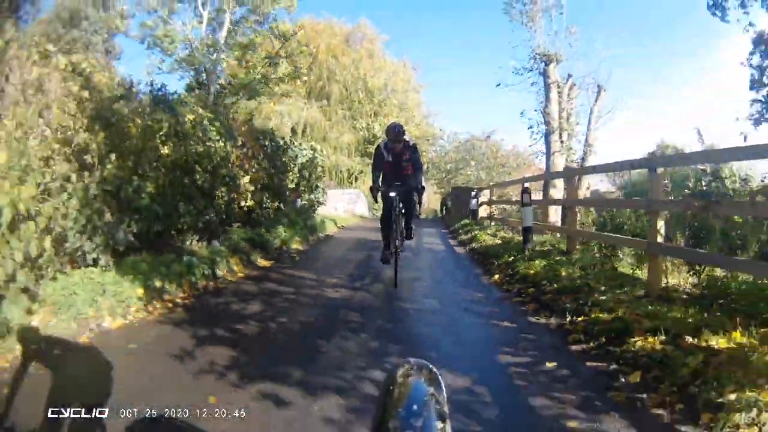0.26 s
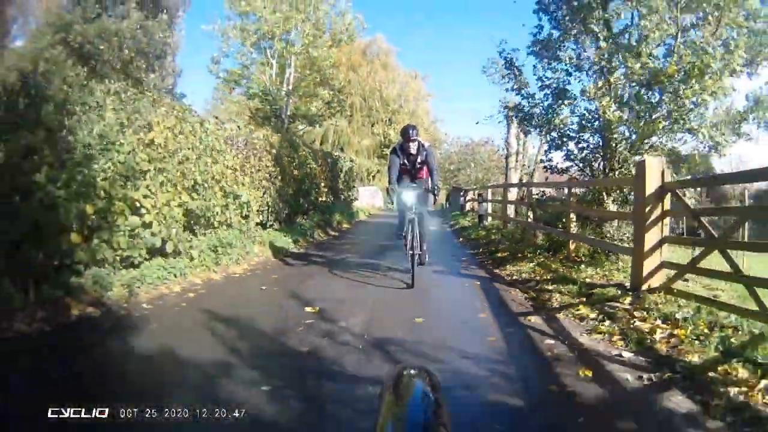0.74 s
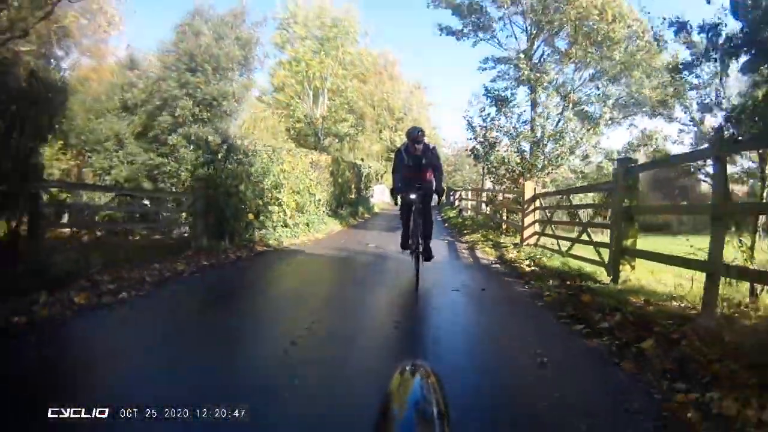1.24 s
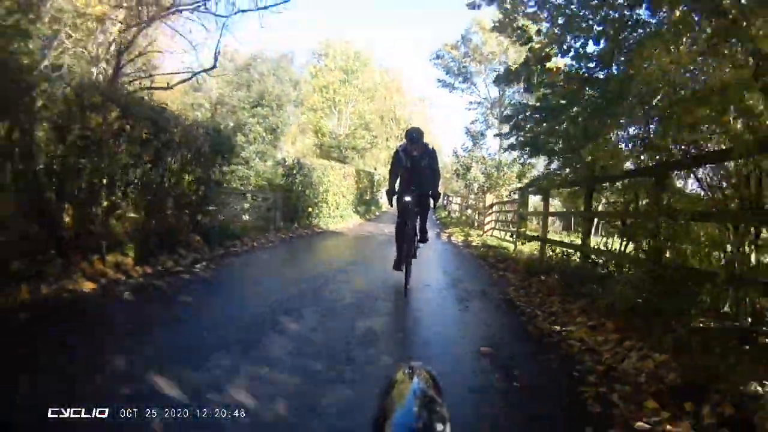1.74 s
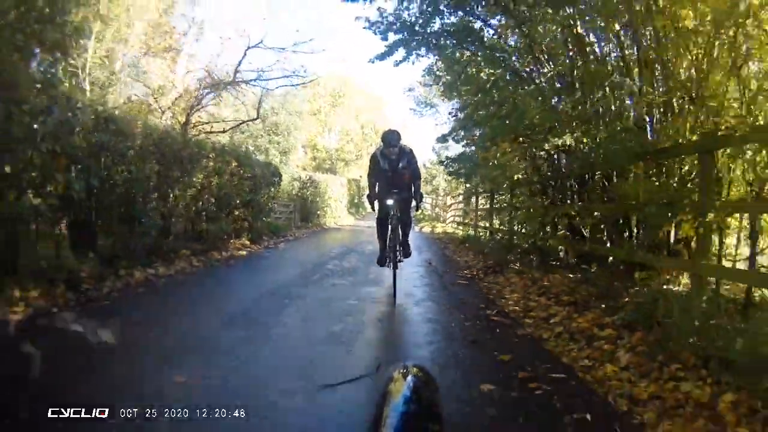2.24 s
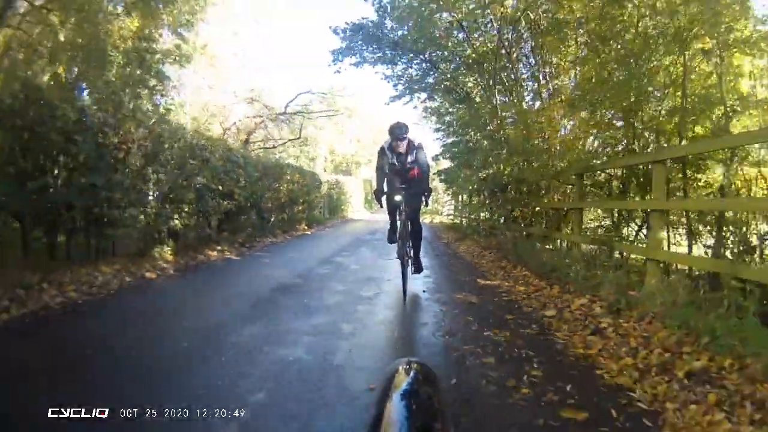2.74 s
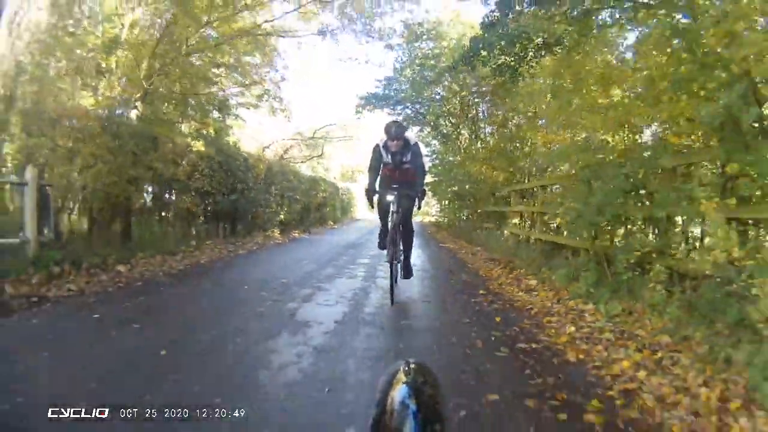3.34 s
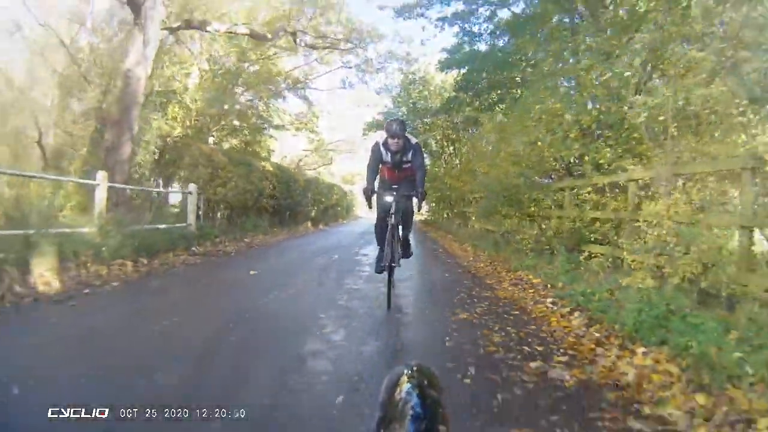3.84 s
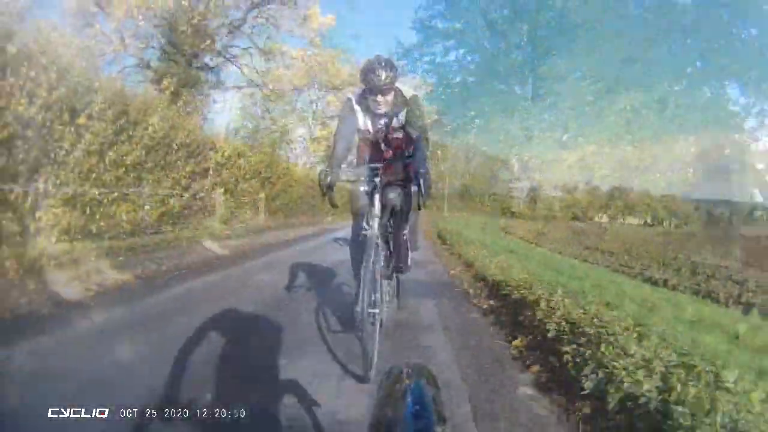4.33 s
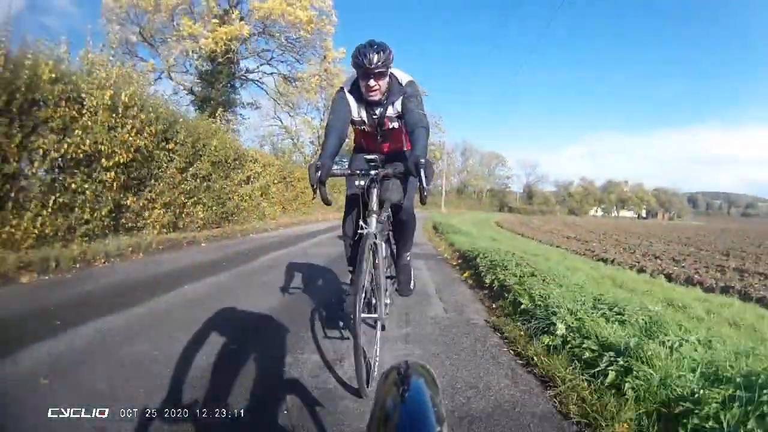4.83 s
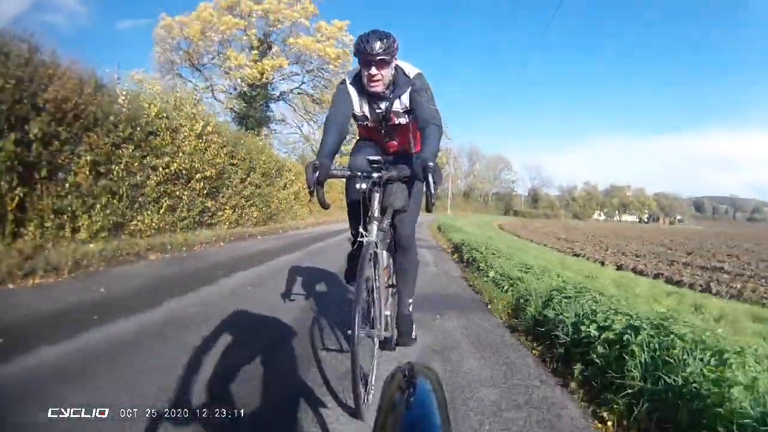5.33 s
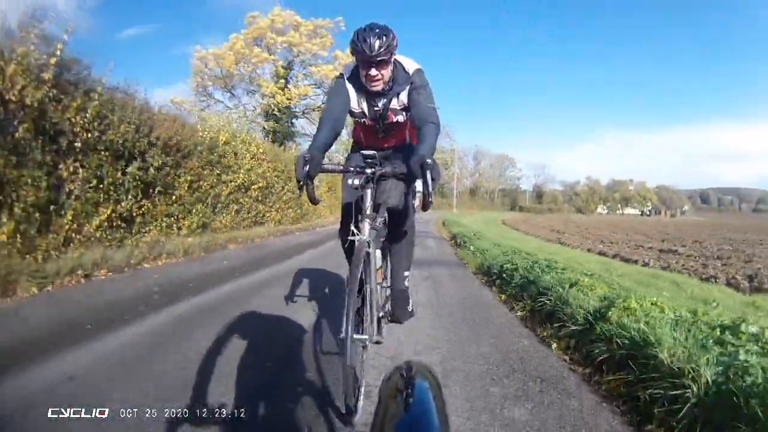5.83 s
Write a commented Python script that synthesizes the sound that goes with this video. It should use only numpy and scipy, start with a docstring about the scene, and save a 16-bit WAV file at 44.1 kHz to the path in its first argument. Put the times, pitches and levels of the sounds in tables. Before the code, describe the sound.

Very close stereo sound from inside a hard plastic housing on a rolling bike. Continuous rough, hollow rushing flutters quickly with the surface. Irregular bursts of tiny hard ticks and sharper snaps jump between the sides, favouring the right, busiest in the first second and a half with some dull bumps. Past four seconds the rush is softer, the clicks thinner, and the last half second nearly free of sharp snaps.

```python
"""On a lane, a camera clamped to a bicycle rolls along, first over rough wet ground, then smoother.
The road shakes the housing: filtered noise whose modes reach two microphones in or out of phase.
Loose parts tick against the case in bursts, some at the left microphone, most at the right:
short noise contacts ring its modes. Dull knocks come through the clamp, and loud peaks overload softly."""
import sys
import numpy as np
from scipy import signal
from scipy.fft import rfft, irfft
from scipy.io import wavfile

SR = 44100
rng = np.random.default_rng(int(sys.argv[2]) if len(sys.argv) > 2 else 0)


def invert_db(level):
    """Linear amplitude ratio for a level in decibels (20 dB per decade), elementwise."""
    return 10 ** (np.asarray(level, dtype=float) / 20)


def wav_out(sig):
    """Save sig, one row per channel (or a flat mono array), as 16-bit PCM at SR to the path in sys.argv[1]."""
    wavfile.write(sys.argv[1], SR, np.round(np.clip(np.atleast_2d(sig).T, -1, 1) * 32767).astype(np.int16))


N = 268128


def drift(corner_hz):
    """Slow random wandering of spread 1: noise smoothed by two equal one-pole low-passes."""
    stride, run_in = 40, 2000      # samples per slow step, slow steps thrown away
    pole = np.exp(-2 * np.pi * corner_hz * stride / SR)
    noise = rng.standard_normal(N // stride + run_in + 2)
    slow = signal.lfilter([1], [1, -2 * pole, pole * pole], noise)[run_in:]
    return np.interp(np.arange(N) / stride, np.arange(len(slow)), slow / slow.std())


def shaken(modes, hz, lumps_db):
    """Noise of its own shakes each mode, which reaches the two microphones with its own phase."""
    out = 0
    for mode_hz, width_hz, left_db, right_db, left_lead in modes:
        resonance = 1 / (1 + 1j * (hz - mode_hz ** 2 / hz) / width_hz) ** 2     # squared: steep skirts
        microphones = np.array([[invert_db(left_db) * np.exp(1j * left_lead)], [invert_db(right_db)]])
        # low modes swell less than high ones
        swell = invert_db(min(mode_hz / 2500, 1) * (lumps_db + 3.35 * drift(corner_hz=64)))
        noise = rng.standard_normal(N) * swell
        out = out + irfft(rfft(noise) * resonance * microphones, N)
    return out


def road(shake_db, rumble_db):
    """Housing modes and a smoother rush swell with the lumps of the surface; the frame rumbles below."""
    # frame modes, nearly in phase on both sides:
    # (frequency [Hz], width [Hz], left level [dB], right level [dB], left lead [rad])
    frame_modes = [(46, 210, -15, -20.5, -0.12), (86.7, 15.6, -5.5, -3, -0.18),
                   (127, 123, -14.5, -9, -0.086), (243, 87, -5.5, -2.5, -0.022),
                   (358.3, 85, -1, -0.5, 0.019)]
    # housing modes, the same columns:
    # (frequency [Hz], width [Hz], left level [dB], right level [dB], left lead [rad])
    housing_modes = [(566, 145, -11, -2, 4), (742.6, 147, -1.5, -3, 2), (950, 220, 2, 4, 3),
                     (1268, 138, -5.5, -7, 0.12), (1970, 480, -24, -16, 1.3), (2559, 350, -0.5, 0, -1.76),
                     (3070, 220, -1.5, 0, -3)]
    # rush that each microphone picks up alone: (frequency [Hz], relative level [dB])
    rush_curve = [(25, -38), (150, -37), (450, -18), (750, -10.5), (1100, -11), (1600, -15.5),
                  (3400, -14.5), (4500, -22), (6000, -30), (9000, -34.5), (12000, -34), (16000, -41.5)]
    right_rush_db = 3

    hz = np.fft.rfftfreq(N, 1 / SR) + 1e-3      # just above zero, for the logarithm
    lumps_db = 1.81 * drift(corner_hz=50)
    curve_hz, curve_db = np.transpose(rush_curve)
    rush_db = np.interp(np.log(hz), np.log(curve_hz), curve_db)
    rush_spectrum = rfft(rng.standard_normal((2, N))) * invert_db(rush_db + [[0], [right_rush_db]])
    rush = irfft(rush_spectrum, N) * invert_db(1.32 * lumps_db)
    housing = rush + shaken(housing_modes, hz, lumps_db)
    rumble = shaken(frame_modes, hz, lumps_db)
    return invert_db(shake_db + 22) * housing + invert_db(rumble_db + 23) * rumble


def contacts(count, contact_s, size):
    """Rough contacts: noise that swells and fades within milliseconds, different at each microphone."""
    duration_s = contact_s * invert_db(3.5 * rng.standard_normal((count, 1, 1)))
    t = (np.arange(size) / SR - 0.003) / duration_s      # strongest 3 ms after the start
    return np.exp(-t ** 2) * rng.standard_normal((count, 2, size))


def rung(touch, modes, band_hz, strength_db=None):
    """Every contact rings decaying modes with strengths of its own; each result has peak 1."""
    out = 0
    for hz, level_db, t60 in modes:
        decay = invert_db(-60 / (t60 * SR))      # gain per sample: 60 dB down after t60
        turn = 2 * np.pi * hz / SR
        mode_db = level_db + 4 * rng.standard_normal(touch.shape[:2] + (1,))
        if strength_db is not None:
            mode_db = mode_db + strength_db(hz)
        resonator = [1, -2 * decay * np.cos(turn), decay * decay]
        out = out + invert_db(mode_db) * signal.lfilter([0, np.sin(turn)], resonator, touch + 1e-18)
    out = signal.sosfilt(signal.butter(2, band_hz, "band", fs=SR, output="sos"), out)
    return out / np.abs(out).max(axis=-1, keepdims=True)


def laid_out(hits, s):
    """Adds up hits on the timeline, each starting 3.5 ms before its time and faded at its end."""
    size = hits.shape[-1]
    out = np.zeros((2, N + size))
    start = np.clip(np.round((s - 0.0035) * SR).astype(int), 0, N)
    fade = np.minimum(1, np.linspace(4, 0, size))      # over the last quarter
    for side in range(2):
        np.add.at(out[side], start + np.arange(size), hits[:, side] * fade)
    return out[:, :N]


def knocks():
    """Bumps pass through the clamp as short dull knocks; modes near the knock's pitch ring most."""
    # knocks heard on both sides: (time [s], relative level [dB], pitch [Hz])
    knock_rows = [(0.215, -15, 1520), (.260, -14, 1900), (.355, -10.5, 950), (0.372, -21, 1320),
                  (.639, -17.5, 1030), (.851, -25, 1310), (0.878, -18, 1390), (.905, -19.5, 800),
                  (6.002, -20, 2000)]
    # modes of the clamp: (frequency [Hz], relative level [dB], time to fall 60 dB [s])
    clamp_modes = [(800, -15, 0.013), (1050, -7.5, 0.015), (1460, 1, 0.0087), (1580, -10, 0.0099),
                   (2000, 0, 0.015)]

    s, peak_db, pitch_hz = np.transpose(knock_rows)[:, :, None, None]
    touch = contacts(len(knock_rows), contact_s=0.0013, size=1024)[:, :1]      # one path for both sides

    def near_pitch_db(hz):
        return -12 * np.abs(np.log2(hz / pitch_hz))      # 12 dB weaker per octave away

    knock = rung(touch, clamp_modes, band_hz=[600, 3000], strength_db=near_pitch_db)
    sides_db = [[-2.5], [1.5]]      # left, right
    return laid_out(knock * invert_db(peak_db + sides_db), s[:, 0] + 0.00304)


def agitation(chatter_db, part):
    """Level of a part's chatter: it follows the ride, and each jolt lifts it, holds it and lets it sink."""
    # jolts that set a loose part chattering, by the microphone it is near, "L" or "R":
    # (middle [s], level [dB], length [s], part)
    jolts = [(0.161, -21, .1, "R"), (.34, -25, .1, "L"), (0.392, -22, .12, "R"), (0.461, -26.5, .25, "L"),
             (0.558, -25, .1, "R"), (0.679, -22.5, .13, "L"), (.85, -26, .22, "R"), (0.884, -28, .15, "L"),
             (1.0, -21, .1, "R"), (1.298, -24, .2, "L"), (1.584, -26, .2, "R"), (1.598, -28, .2, "L"),
             (1.853, -23, .12, "R"), (2.471, -20, .11, "R"), (2.702, -28, .2, "R"), (3.11, -24, .05, "R"),
             (3.162, -25, .09, "L"), (3.475, -26, .07, "R"), (3.5, -29, .25, "L"), (3.587, -25, .06, "R"),
             (3.721, -26, .22, "R"), (4.051, -31, .15, "L"), (4.138, -20, .15, "R"), (4.141, -29, .15, "L"),
             (4.347, -22, .18, "R"), (4.55, -26, .13, "R"), (4.575, -31, .12, "L"), (4.669, -25, .08, "R"),
             (4.934, -28, .09, "R"), (5.154, -33, .27, "R"), (5.2, -34, .4, "L"), (5.349, -26, .14, "R")]
    # chatter between jolts, against the ride's chatter: part "L" or "R" -> (level [dB])
    calm_offset_db = {"L": -0.55, "R": 0.48}
    rise, hold = 0.3, 0.35      # shares of a jolt's length; it sinks in the rest

    t = np.arange(N) / SR
    calm_db = chatter_db + calm_offset_db[part]
    corners = np.cumsum([-0.5, rise, hold, 1 - rise - hold])
    level_db = calm_db
    for s, top_db, length_s, struck in jolts:
        if struck == part:
            lift = np.interp(t, s + length_s * corners, [0, 1, 1, 0])
            level_db = np.maximum(level_db, calm_db + lift * (top_db - calm_db))
    return level_db


def chatter(level_db, pan_db, count=1250):
    """Draws small ticks of one part: harder shaking makes them denser, stronger and brighter."""
    density = np.cumsum(invert_db(1.3 * level_db))
    at = np.interp(rng.random(count), density / density[-1], np.arange(N)).astype(int)
    size_db = 1.78 * np.minimum(rng.exponential(1, count), 3) + 3.1 * drift(corner_hz=42)[at]
    peak_db = 0.66 * (level_db[at] + 20.5) + size_db - 21
    treble_db = -16.5 + 1.32 * (level_db[at] + 18) + size_db + 4 * rng.standard_normal(count)
    return np.transpose([at / SR, peak_db, np.full(count, pan_db), treble_db])


def rattle(rows, contact_s, level_db):
    """Each tick rings the case; hard ones favour its upper modes and ring its treble more."""
    # lower modes of the case: (frequency [Hz], relative level [dB], time to fall 60 dB [s])
    case_modes = [(2040, -21, 0.0097), (2560, 7, 0.0012), (3060, 12.5, 0.0053), (3418, 6, 0.011),
                  (3733, -7, 0.014), (4190, -28.5, 0.011)]
    # treble modes of the case: (frequency [Hz], relative level [dB], time to fall 60 dB [s])
    treble_modes = [(4900, -21, 0.00027), (6900, -12, 0.0016), (7780, 11, 0.00093), (9480, 16.5, 0.00097),
                    (10800, -12, 0.00052), (13700, -2, 0.0017)]
    smooth_road_s = 4.05

    s, peak_db, pan_db, treble_db = np.transpose(rows)[:, :, None, None]
    touch = contacts(len(rows), contact_s, size=512)
    # dB per octave; ticks are thinner on the smooth road
    tilt_db = 2.3 * (treble_db + 21.5) + 36 * (s > smooth_road_s)

    def upper_modes_db(hz):
        return tilt_db * np.log2(hz / 3000)

    tick = rung(touch, case_modes, band_hz=[1500, 5000], strength_db=upper_modes_db)
    tick += invert_db(treble_db - 1) * rung(touch, treble_modes, band_hz=[4500, 14000])
    sides = invert_db(pan_db * [[0.5], [-0.5]])
    sides /= np.sqrt((sides ** 2).sum(axis=1, keepdims=True))      # same power at any pan
    return laid_out(tick * sides * invert_db(peak_db + level_db), s[:, 0])


def scene():
    """Road shaking and knocks, with chatter and clear ticks of the loose parts over them."""
    # the ride, levels relative:
    # (time [s], road shaking [dB], frame rumble [dB], chatter between jolts [dB])
    ride = [(0, -40, -53.5, -32), (1.2, -40, -53.5, -31.5), (2.2, -40, -53, -33), (3.0, -40, -52, -34.5),
            (3.9, -39.5, -51.5, -34), (4.3, -43.5, -55, -33), (4.8, -44.5, -54.5, -38.5),
            (6.08, -45.5, -53.5, -38)]
    # clear ticks of a left, centre or right part, "L", "C" or "R":
    # (time [s], relative level [dB], relative treble [dB], part)
    clear_ticks = [(0.084, -9, -9, "R"), (0.1048, -9, -23, "C"), (0.1477, -9.5, -14, "R"),
                   (0.1546, -10, -4, "R"), (0.1612, -7.5, -8.5, "R"), (0.169, -7, -11, "R"),
                   (0.2176, -10.5, -9.5, "C"), (.2343, -12, -34, "C"), (0.2614, -7, -15, "C"),
                   (0.3595, -7, -16, "C"), (.3848, -4, -9, "R"), (.4, -12, -5, "R"), (.405, -12, -6, "R"),
                   (0.413, -6, -12, "R"), (0.4374, -9, -10.5, "L"), (.4528, -13, -28, "L"),
                   (0.4933, -24, -29, "C"), (.5236, -10.5, -16, "L"), (0.5665, -8, -15, "C"),
                   (0.5965, -6, -12.5, "L"), (0.643, -17, -17, "C"), (0.6675, -15, -26, "L"),
                   (0.6875, -8.5, -7.5, "L"), (0.7913, -2.5, -11, "R"), (0.906, -7, -14, "C"),
                   (.9746, -4.5, -8.5, "L"), (.9815, -12.5, -10, "R"), (.992, -22, 2, "R"),
                   (1.014, -4, -13, "R"), (1.041, -6.5, -11, "C"), (1.0715, -13, -20, "C"),
                   (1.137, -9, -9, "L"), (1.1697, -15, -45, "C"), (1.2112, -4.5, -6, "R"),
                   (1.252, -7, -9, "C"), (1.2813, -10, -11, "L"), (1.2949, -12, -21, "L"),
                   (1.516, -17, -13.5, "R"), (1.546, -24, -14, "R"), (1.5657, -16, -14, "R"),
                   (1.5902, -12, -29, "L"), (1.6078, -7.5, -10, "R"), (1.8384, -6.5, -11, "R"),
                   (1.8579, -1, -9.5, "R"), (1.8944, -9.5, -16, "R"), (1.9061, -8.5, -19, "L"),
                   (2.2307, -6.5, -10, "R"), (2.249, -10, -13, "R"), (2.2786, -12.5, -17, "R"),
                   (2.3232, -9.5, -20, "L"), (2.403, -3, -13, "R"), (2.4583, -7, -17, "R"),
                   (2.469, -8, -12, "R"), (2.476, -2.5, -8, "R"), (2.529, -5, -18, "L"),
                   (2.6689, -4.5, -16.5, "R"), (2.86, -8, -8.5, "R"), (2.8661, -6.5, -17, "R"),
                   (3.1047, -3.5, -10.5, "R"), (3.11, -4, -6, "R"), (3.1626, -15, -18, "L"),
                   (3.169, -8.5, -11, "L"), (3.1783, -2, -11, "L"), (3.2786, -10, -26, "R"),
                   (3.3993, -12, -18, "L"), (3.449, -9.5, -42, "C"), (3.4646, -9, -13, "C"),
                   (3.5771, -10, -19, "R"), (3.6211, -15, -11, "R"), (3.6762, -7.5, -17, "C"),
                   (3.6964, -9, -34, "R"), (3.7204, -11, -9, "R"), (3.731, -9, -27, "R"),
                   (3.7427, -14, -5, "R"), (3.7493, -6.5, -16, "C"), (3.8266, -8.5, -14.5, "R"),
                   (4.003, -16, -14, "L"), (4.0172, -9, -9, "L"), (4.0639, -8.5, -14, "L"),
                   (4.0755, -8.5, -8, "L"), (4.154, -8, -6.5, "R"), (4.186, -12.5, -6.5, "R"),
                   (4.2267, -9.5, -6, "C"), (4.32, -7, -8, "R"), (4.3584, -12, -10, "R"),
                   (4.384, -7, -10, "R"), (4.461, -8, -14.5, "R"), (4.5032, -4, -11, "R"),
                   (4.5128, -9.5, -10.5, "R"), (4.5684, -9, -9.5, "L"), (4.6527, -12, -13, "R"),
                   (4.659, -5, -38, "R"), (4.6736, -11.5, -29, "R"), (4.681, -9.5, -14, "R"),
                   (4.7099, -5, -13, "C"), (4.749, -18, -14, "C"), (4.919, -9, -19, "R"),
                   (4.9581, -9.5, -21, "R"), (5.017, -12, -27, "L"), (5.063, -17, -19, "R"),
                   (5.0908, -8, -29, "R"), (5.189, -21, -22, "R"), (5.2654, -12, -35, "C"),
                   (5.3092, -12, -38, "R"), (5.3155, -11.5, -13, "C"), (5.3505, -2, -11, "R"),
                   (5.3895, -8, -19, "R"), (5.4103, -12, -15, "R"), (5.4813, -10, -13.5, "L"),
                   (6.0075, -11, -14, "C")]
    # left level over right level of each loose part: part "L", "C" or "R" -> (difference [dB])
    part_pan_db = {"L": 36, "C": -4.5, "R": -39}

    ride_s, *levels = np.transpose(ride)
    t = np.arange(N) / SR
    shake_db, rumble_db, chatter_db = [np.interp(t, ride_s, level) for level in levels]

    left = chatter(agitation(chatter_db, "L"), pan_db=7.5)
    right = chatter(agitation(chatter_db, "R"), pan_db=-35)
    small_ticks = rattle(np.vstack([left, right]), contact_s=0.00085, level_db=3.5)
    clear = [(s, peak_db, part_pan_db[part], treble_db) for s, peak_db, treble_db, part in clear_ticks]
    loud_ticks = rattle(clear, contact_s=0.0011, level_db=1)
    return road(shake_db, rumble_db) + knocks() + small_ticks + loud_ticks


def top_cut(x):
    """Nothing passes above the cut-off."""
    return signal.sosfilt(signal.butter(12, 16990, fs=SR, output="sos"), x)


def record(dry):
    """Peaks are softly rounded off, then a steep low-pass cuts the top."""
    overload = 0.62      # highest level that the rounding lets through
    rounded = overload * np.tanh(dry / overload)
    low_pass = signal.cheby2(10, 18, 16300, fs=SR, output="sos")      # 18 dB down from 16300 Hz
    finished = signal.sosfilt(low_pass, rounded)
    return top_cut(finished)


dry = scene()
out = record(dry)
wav_out(out)
```